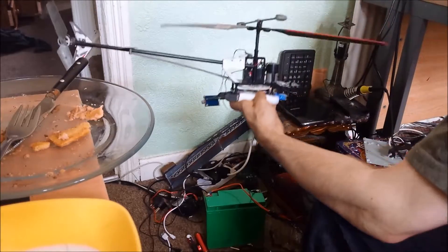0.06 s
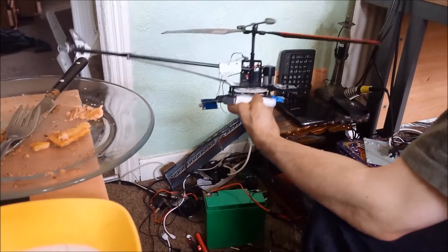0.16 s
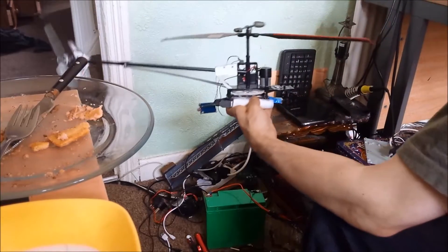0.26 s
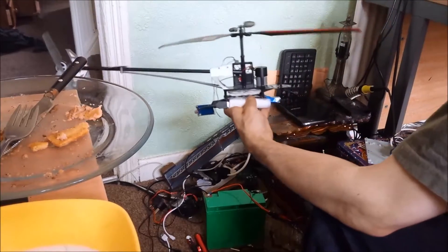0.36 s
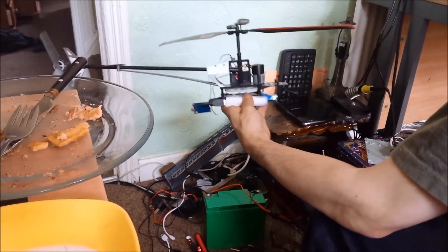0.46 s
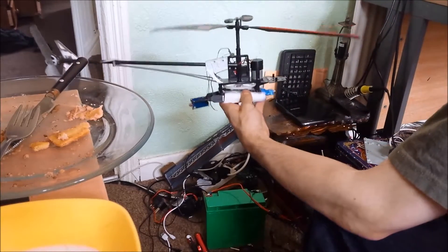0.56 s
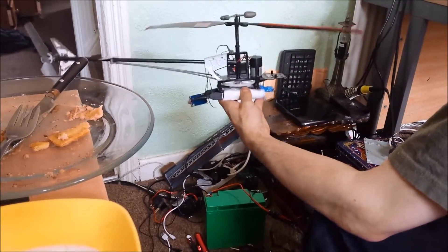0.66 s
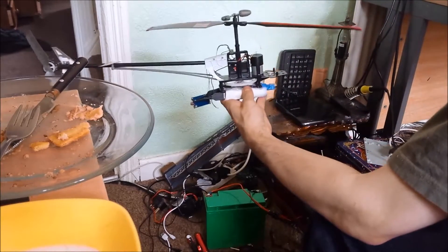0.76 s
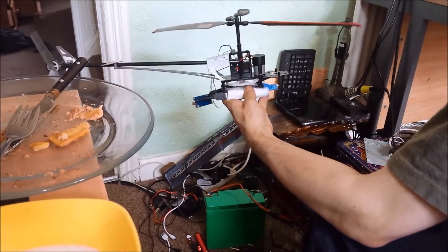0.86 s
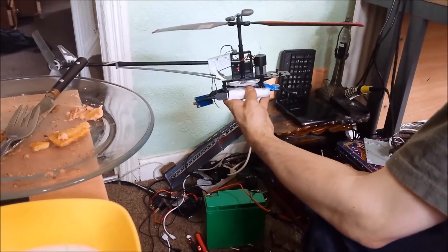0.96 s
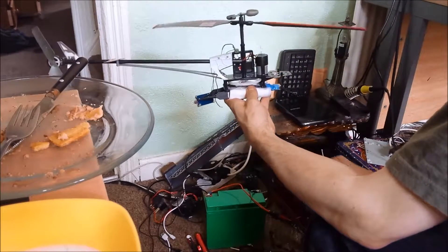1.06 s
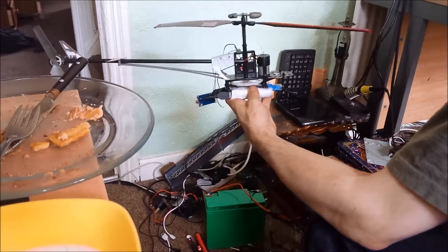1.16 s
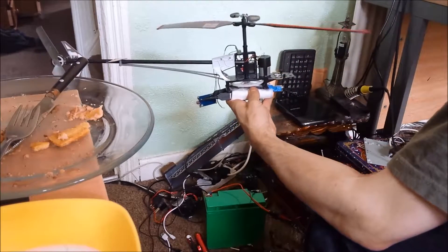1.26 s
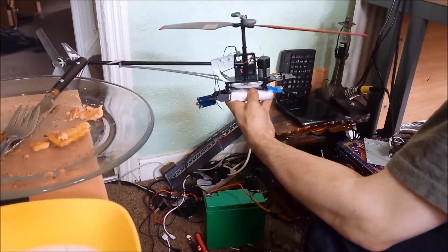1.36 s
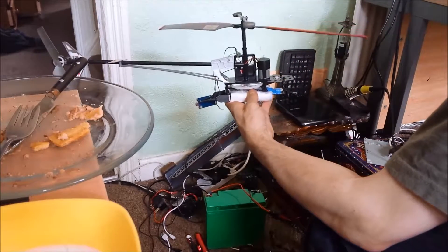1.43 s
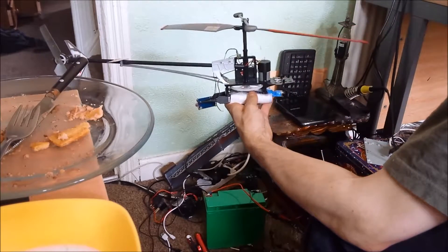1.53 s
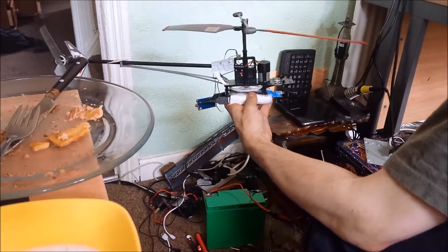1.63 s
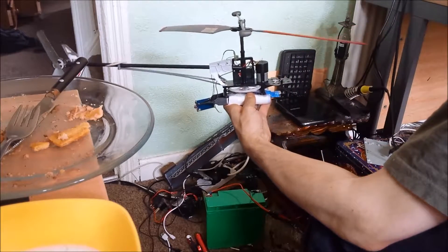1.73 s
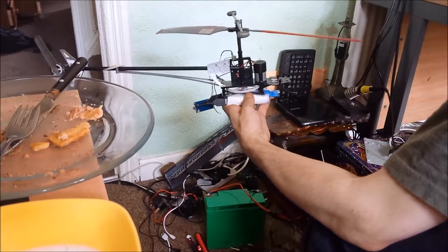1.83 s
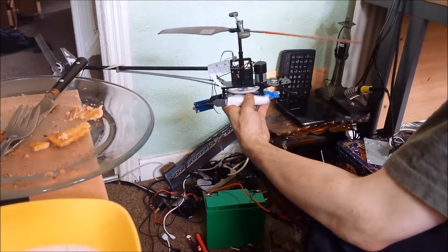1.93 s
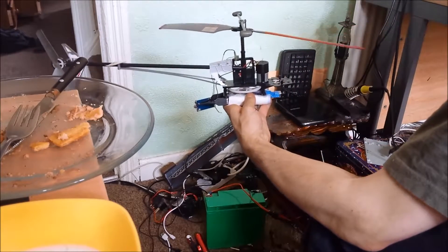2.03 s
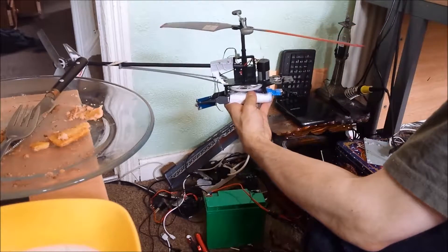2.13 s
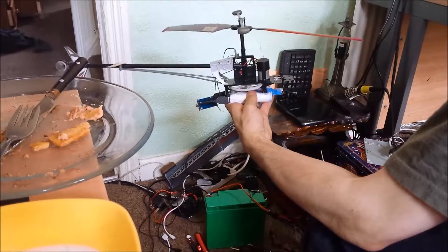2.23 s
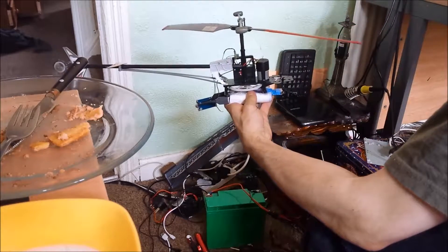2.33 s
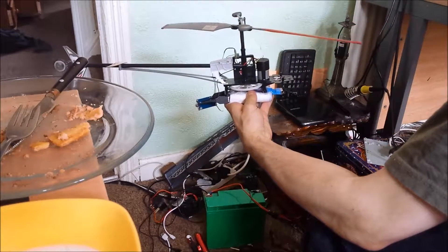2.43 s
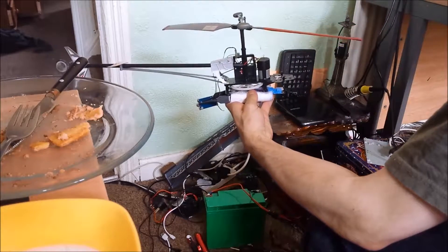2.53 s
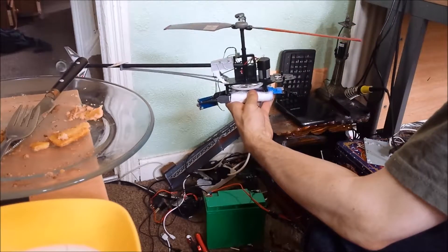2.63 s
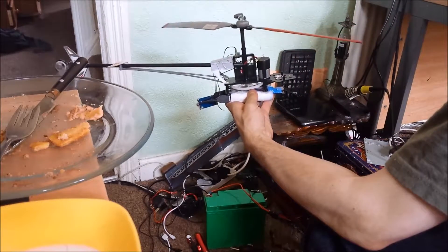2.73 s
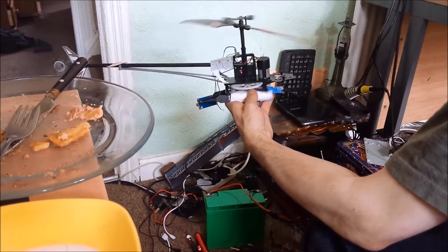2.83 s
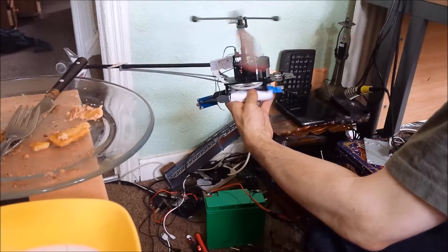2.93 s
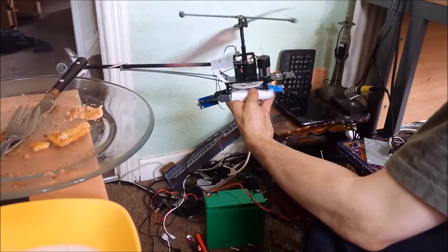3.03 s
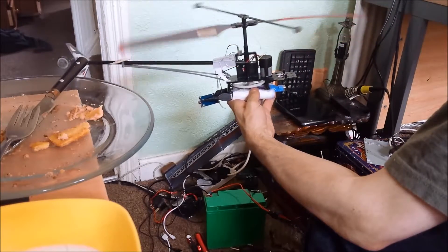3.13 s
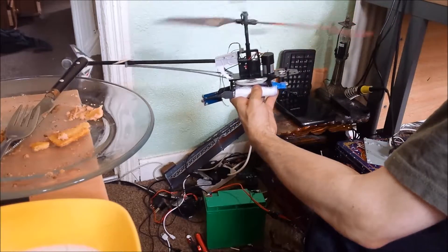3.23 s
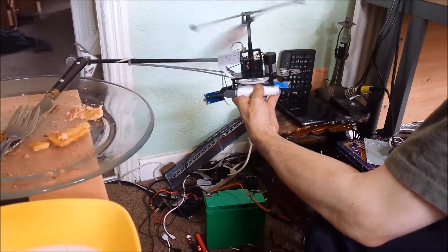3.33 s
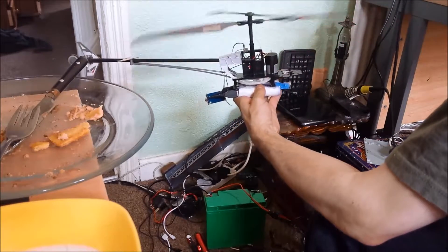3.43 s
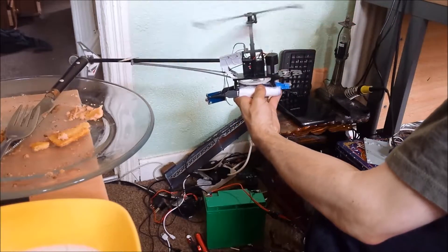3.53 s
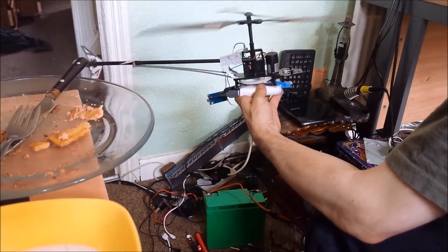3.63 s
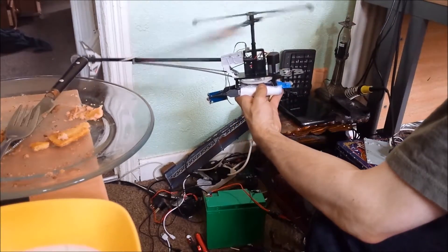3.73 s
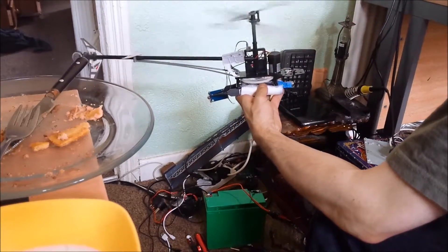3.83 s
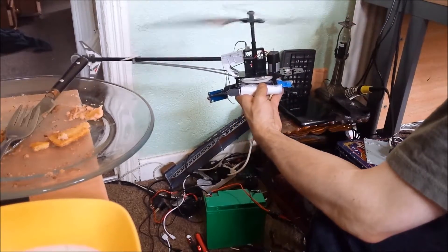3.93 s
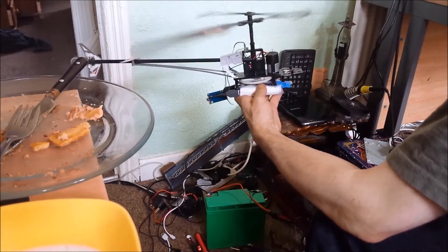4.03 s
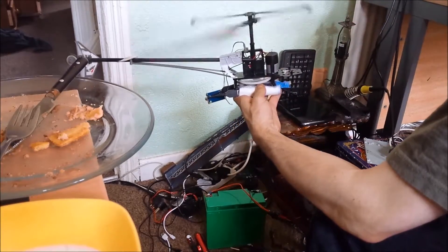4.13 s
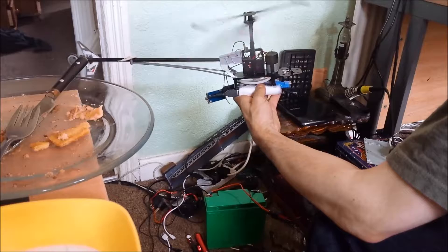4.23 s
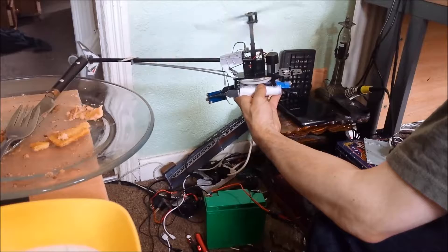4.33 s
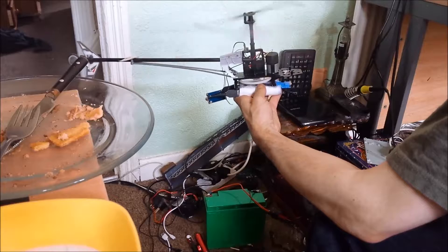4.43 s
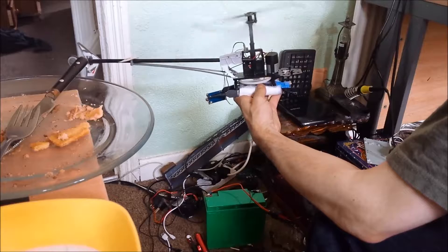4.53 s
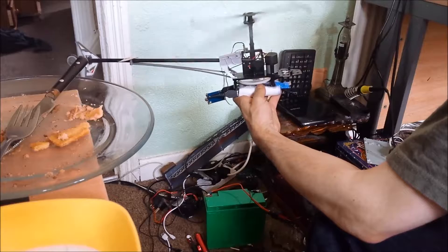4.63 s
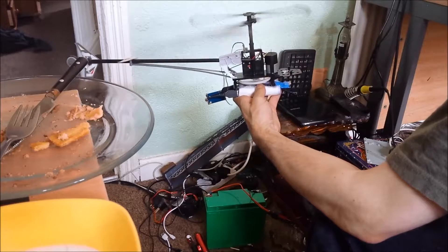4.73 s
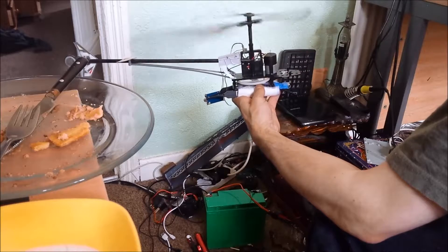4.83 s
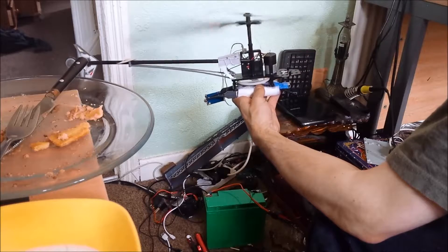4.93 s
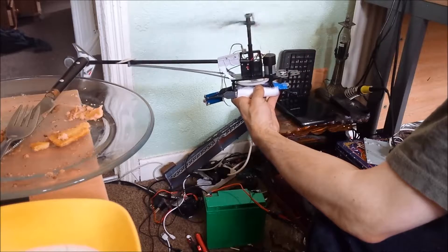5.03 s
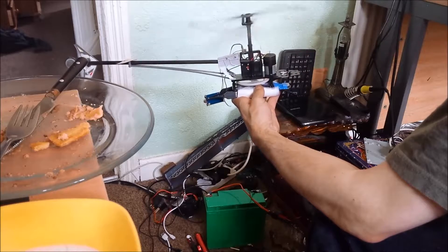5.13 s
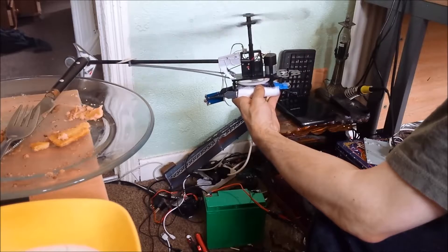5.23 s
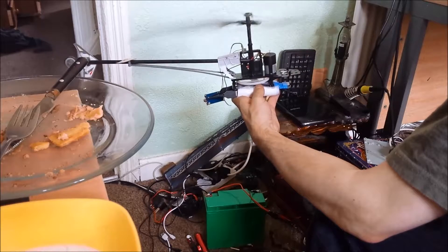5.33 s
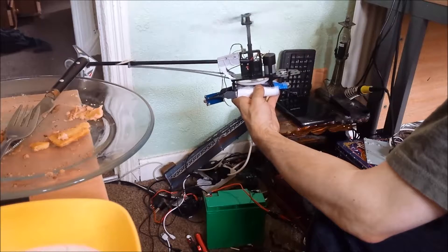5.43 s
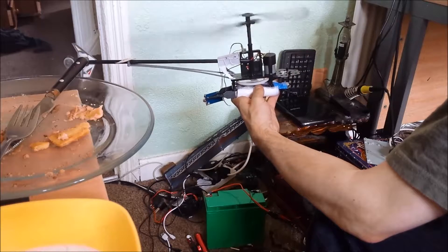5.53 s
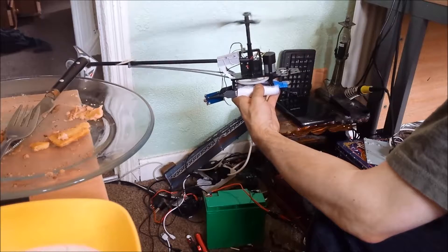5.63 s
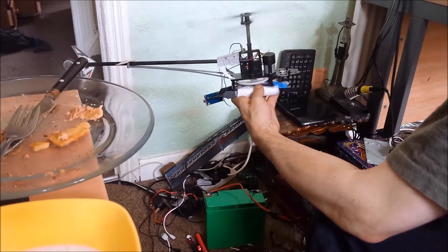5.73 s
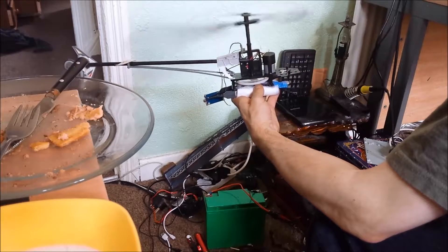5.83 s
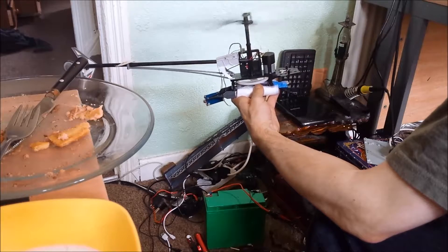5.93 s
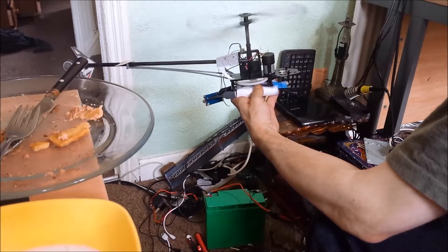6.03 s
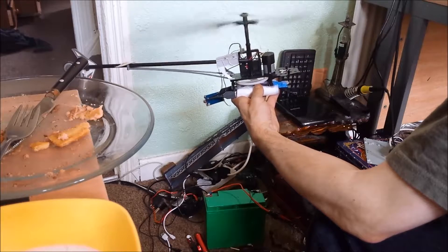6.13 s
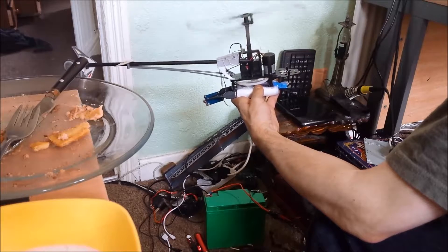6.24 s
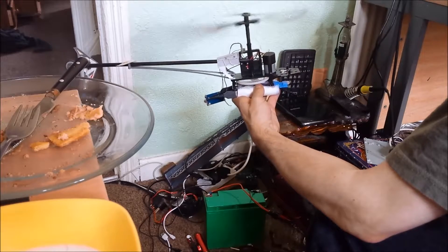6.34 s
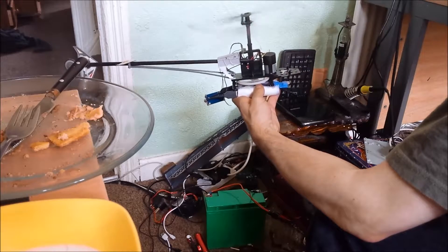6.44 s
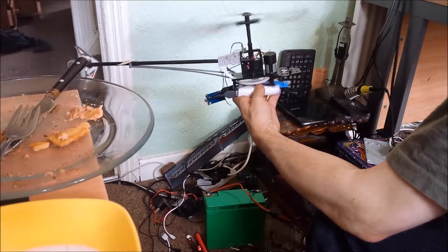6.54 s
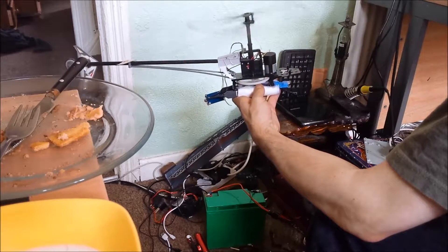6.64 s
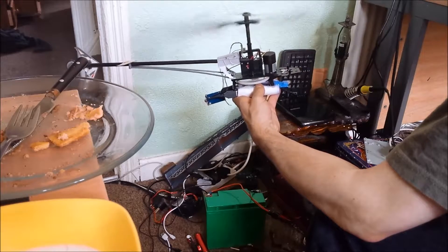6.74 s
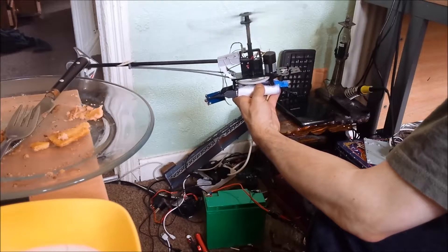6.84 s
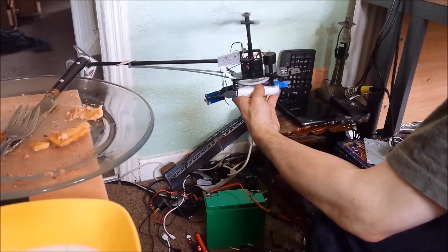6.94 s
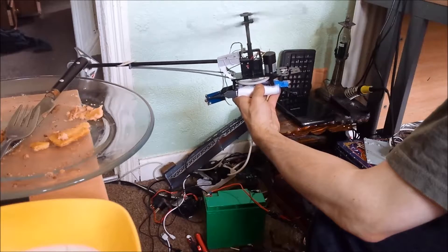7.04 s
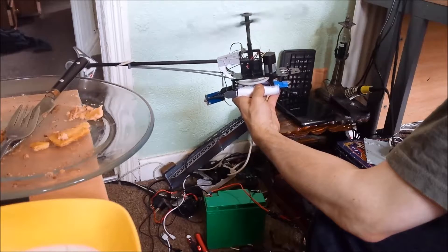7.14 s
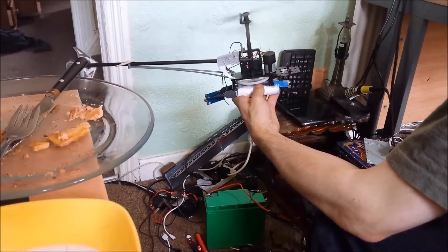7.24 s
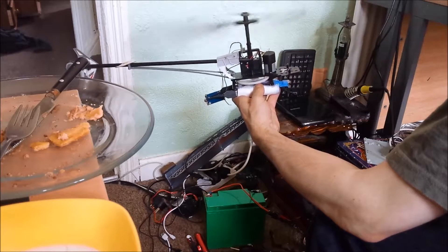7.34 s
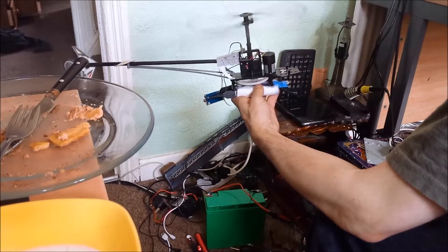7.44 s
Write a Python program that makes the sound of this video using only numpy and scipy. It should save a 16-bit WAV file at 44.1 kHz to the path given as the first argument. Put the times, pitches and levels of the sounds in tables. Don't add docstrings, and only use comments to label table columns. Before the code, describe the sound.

From 0 to 2.2 s the scene is quiet: low outside rumble and a soft room hiss, busiest at the start and sinking by 1.8 s. A thin, wavering, high squeak passes faintly at 0.3-0.45 s, and small dry finger ticks are scattered about, clearest near 1.2 and 1.7 s. At 2.27 s a small tail motor starts abruptly, buzzing grittily and rising until power cuts at 2.55 s, then runs down faintly. At 2.9 s the main motor turns with weak, stuttering false starts, then winds up from 3.4 s. Bright plastic gear rattle throbs faster and swells, with sharp loose knocks crowding 3.7-5 s. From 5 s it is a loud, dense, nearly steady whirring rattle over a low drone and airy rumble, knocks softer within it. It pushes faster after 6 s and again near 7.5 s, ending still running. Close stereo, short room echo.

```python
import sys
import numpy as np
from scipy import signal
from scipy.fft import rfft, irfft
from scipy.io import wavfile

SR = 44100
rng = np.random.default_rng(int(sys.argv[2]) if len(sys.argv) > 2 else 0)


def elevation(decibels):
    levels = np.asarray(decibels, float)
    return 10 ** (levels / 20)


def wav_record(signal):
    frames = np.transpose(np.atleast_2d(signal))
    bounded = np.clip(frames, -1, 1)
    quanta = np.round(bounded * 32767).astype(np.int16)
    wavfile.write(sys.argv[1], SR, quanta)


N = 329986
FULL_LOAD_DB = -26


def in_time(rows):
    seconds, *columns = np.transpose(rows)
    return [np.interp(np.arange(N) / SR, seconds, column) for column in columns]


def at_hz(points, hz):
    points = np.array(points)
    return np.interp(np.log(hz + 1), np.log(points[:, 0] + 1), points[:, 1])


def rms_one(x):
    return x / np.sqrt(np.mean(x ** 2) + 1e-20)


def drift(rate_hz):
    r = np.exp(-2 * np.pi * rate_hz / SR)
    noise = rng.standard_normal(N + SR)
    return rms_one(signal.lfilter([1], [1, -2 * r, r * r], noise)[SR:])


def split(x, hz):
    filters = [signal.butter(2, hz, kind, fs=SR, output="sos") for kind in ("low", "high")]
    return [signal.sosfilt(np.tile(sos, (2, 1)), x) for sos in filters]


def running(start_s, stop_s=np.inf):
    t = np.arange(N) / SR
    return (t > start_s) & (t < stop_s)


def teeth(per_s, uneven_db):
    own_share = 0.72
    uneven = np.minimum(rng.exponential(1, (3, N)), 5)
    sizes = elevation(uneven_db * uneven) * rng.choice([-1, 1], (3, N))
    both, *own = sizes * (rng.random((3, N)) < per_s / SR)
    return rms_one(np.sqrt(1 - own_share) * both + np.sqrt(own_share) * np.array(own))


def burst(s, db, hz, t60, ring, top_hz, hold_s=0.):
    out, start, t = np.zeros(N), round(s * SR), np.arange(SR // 4) / SR
    band = signal.butter(2, [1300, top_hz], "band", fs=SR, output="sos")
    noise = signal.sosfilt(band, rng.standard_normal(len(t)))
    tone = rms_one(signal.lfilter(*signal.iirpeak(hz, 7.0, fs=SR), noise))
    blow = (noise + ring * tone) * elevation(-60 * np.maximum(t - hold_s, 0) / t60)
    blow = blow * elevation(db) / np.abs(blow).max()
    out[start:start + len(t)] = blow[:N - start]
    return out


# frequency in Hz, left minus right in dB.
EAR_BALANCE = [(60, 15.5), (99, 3), (160, 13.5), (270, -12.5), (450, 7.5), (740, -5.5), (1210, 2.5),
               (2000, 0), (3310, 0), (5460, 8), (9010, -7.5), (14900, -4.5)]


def coloured(x, spectrum, peaks=(), side=0):
    size = 8192
    hz = np.arange(size // 2 + 1) * SR / size
    db = at_hz(spectrum, hz) + side * at_hz(EAR_BALANCE, hz) / 2
    db = db + sum(top / (1 + (2 * (hz - f) / width) ** 2) for f, width, top in peaks)
    cepstrum = irfft(np.log(np.maximum(elevation(db), 1e-5)))
    cepstrum[1:size // 2] *= 2
    cepstrum[size // 2 + 1:] = 0
    return signal.fftconvolve(x, irfft(np.exp(rfft(cepstrum))))[:N]


def to_ears(pair, spectrum, peaks=()):
    room_t60_s, room_db, left_lag_s = 0.27, -8, 6.5e-5
    t, ears = np.arange(int(.4 * SR)) / SR, []
    for x, side in zip(pair, (1, -1)):
        echo = rng.standard_normal(len(t)) * elevation(-60 * t / room_t60_s) * (t > .003)
        echo = echo / np.linalg.norm(echo)
        heard = coloured(x, spectrum, peaks, side)
        late = np.interp(np.arange(N) - (side > 0) * left_lag_s * SR, np.arange(N), heard)
        ears.append(late + elevation(room_db) * signal.fftconvolve(heard, echo)[:N])
    return rms_one(np.array(ears)) * np.sqrt(np.mean(pair ** 2))


# time in seconds, rattle level in dB.
GEAR_LOAD = [(2.88, -41), (2.93, -37), (2.99, -33), (3.08, -44.5), (3.1, -32.5), (3.31, -37.5),
             (3.38, -34.5), (5.04, -25), (5.12, -26.5), (5.21, -25), (5.36, -26.5), (5.42, -23),
             (5.61, -24), (5.62, -23.5), (7.21, -23), (7.48, -24)]
# time in seconds, speed in turns per second.
MOTOR_SPEED = [
    (2.9, 16.1),
    (3.5, 37),
    (4.0, 56),
    (4.5, 71),
    (5.0, 82),
    (5.5, 88),
    (6.0, 89),
    (6.5, 103),
    (7.0, 101),
    (7.48, 121),
]
# frequency in Hz, level in dB per Hz.
GEAR_TONE = [(210, -56), (350, -25.5), (552, -15.5), (646, -16), (1120, -7), (1770, -10.5), (2830, -3),
             (3260, -5), (4690, -2.5), (5400, 0.5), (8120, -6), (13000, -20.5), (14300, -17.5),
             (15000, -55.5)]
# frequency in Hz, width in Hz, height in dB.
FRAME_RINGS = [(178.6, 12, 44), (1950, 26, 5), (2120, 14, 6), (2976, 200, 3.5), (2930, 31, -10),
               (4107, 53, 4.5), (4260, 90, 1), (5220, 48, -4.5), (5670, 60, 1.5), (6090, 81, 5.5),
               (6840, 63, 6.5), (7590, 70, 6)]


def main_drive():
    (load_db,), (turns,) = in_time(GEAR_LOAD), in_time(MOTOR_SPEED)
    short_db = load_db - FULL_LOAD_DB
    settled = turns / 52.5
    thin_db = -6.5 * np.maximum(1 - settled, 0)

    phase = 2 * np.pi * np.cumsum(turns * (1 + 0.0084 * drift(5.56))) / SR
    once_per_turn = np.cos(phase) + 0.17 * np.cos(2 * phase + 1.7)
    flutter_db = 0.77 * drift(29.0) + 1.0 * drift(57.0)
    throb_db = np.minimum(settled, 1) ** 2 * (2.1 * once_per_turn + flutter_db)

    loose = teeth(270, 3.3) * elevation(-13) * shaking()
    mesh = teeth(9000.0, 2.2) * elevation(throb_db) + loose
    low, rest = split(mesh * running(2.882), 950)
    drone, low = split(low, 260)
    middle, high = split(rest, 2350)
    high, air = split(high, 8000)
    rattle = high * elevation(load_db - 1.15)
    rattle = rattle + middle * elevation(-24.5 + 0.7 * short_db + thin_db)
    rattle = rattle + low * elevation(-23 + 0.42 * short_db + thin_db)
    rattle = rattle + air * elevation(-25 + 0.91 * short_db)
    rattle = rattle + drone * elevation(-19 + 0.83 * short_db)
    return to_ears(rattle + gear_knocks(), GEAR_TONE, FRAME_RINGS)


def shaking():
    turns, = in_time(MOTOR_SPEED)
    top_turns, half_width_turns = 66, 45
    return 1 / (1 + ((turns - top_turns) / half_width_turns) ** 2)


# time in seconds, peak in dB, pitch in Hz.
SLACK_KNOCKS = [(2.9287, -22, 5440), (3.0923, -21, 5180), (3.6895, -18, 6750), (3.7428, -20, 6190),
                (3.7922, -17, 5120), (3.8755, -15, 6760), (3.901, -16, 6220), (3.9449, -16, 6350),
                (4.0995, -10, 7340), (4.1559, -14, 7340), (4.2038, -17, 5480), (4.2612, -17, 5650),
                (4.3285, -10, 5310), (4.3449, -14, 5530), (4.5295, -14, 5470), (4.545, -12, 6220),
                (4.589, -11, 5080), (4.7371, -10, 6150), (4.8029, -10, 5570), (4.975, -11, 6670),
                (5.1432, -14, 5090), (5.2125, -8, 6080), (5.4006, -10, 6080), (5.5193, -10, 5570),
                (5.679, -10, 6670), (5.7448, -9, 6040), (5.8471, -10, 6150), (5.888, -10, 5120),
                (6.8183, -9, 5330), (6.8697, -10, 5110)]


def gear_knocks():
    late_s, late_db = 4.9, -4.5
    knocks = np.zeros(N)
    for s, db, hz in SLACK_KNOCKS:
        peak_db = db + 1.0 + (s > late_s) * late_db
        knocks += burst(s - .0005, peak_db, hz, t60=.022, ring=0.46, top_hz=16000, hold_s=.003)
    return .7 * knocks + .7 * split(knocks, 5000)[1] + .4 * split(knocks, 9000)[1]


# time in seconds, level in dB.
TAIL_BURST = [
    (2.272, -43),
    (2.3, -39),
    (2.33, -39),
    (2.41, -32.5),
    (2.536, -31),
    (2.552, -39.5),
    (2.612, -45.5),
    (2.75, -48),
    (2.9, -52.5),
]
# frequency in Hz, level in dB per Hz.
TAIL_TONE = [(210, -45), (350, -30), (384, -23.5), (509, -9), (866, -17), (1220, -11), (1980, -12.5),
             (2970, -3.5), (4390, -7), (5380, -1.5), (9730, -9), (14600, -23)]


def tail_motor():
    level_db, = in_time(TAIL_BURST)
    turning = running(TAIL_BURST[0][0], TAIL_BURST[-1][0])
    mesh = teeth(7000.0, 3.4) * elevation(level_db + 1.3 * drift(48.0))
    return to_ears(mesh * turning, TAIL_TONE)


# time in seconds, peak in dB, pitch in Hz, ring share, left minus right in dB.
FINGER_TICKS = [(0.164, -47, 6960, 0.53, -4), (0.2744, -50, 5930, .6, -0.5), (0.6389, -54, 2400, .6, -2),
                (0.734, -50, 7000, 1.5, -3), (1.029, -56, 6250, .4, -10), (1.215, -42.5, 7260, 0.85, -3),
                (1.212, -49, 3460, 3.5, 2), (1.36, -55, 4010, 3.0, -1), (1.503, -49, 6250, .6, -3),
                (1.6786, -41.5, 5750, 0.88, 1), (1.9425, -57, 5170, .6, -1.5),
                (2.0174, -56, 6570, .6, -1.0)]
# time in seconds, pitch in Hz, level in dB.
RUB_SQUEAK = [
    (0.27, 6200, -72),
    (0.31, 6150, -62),
    (0.37, 6020, -60),
    (0.40, 6280, -55),
    (0.45, 6150, -76),
]


def handling():
    ticks = np.zeros((2, N))
    for s, db, hz, ring, pan in FINGER_TICKS:
        for ear, side in enumerate((1, -1)):
            ticks[ear] += burst(s, db + 4.5 + side * pan / 2, hz, t60=0.21, ring=ring, top_hz=10800)
    hz, db = in_time(RUB_SQUEAK)
    t = np.arange(N) / SR
    fade = np.clip(np.minimum(t - RUB_SQUEAK[0][0], RUB_SQUEAK[-1][0] - t) / .015, 0, 1)
    wave = np.sqrt(2) * np.sin(2 * np.pi * np.cumsum(hz * (1 + .01 * drift(300.0))) / SR)
    return ticks + wave * elevation(db - 0.5 + 3.7 * drift(60.0)) * fade


# time in seconds, level in dB.
ROOM_BUSTLE = [
    (0, -1.5),
    (0.16, 0),
    (0.35, -0.2),
    (0.6, -4),
    (0.9, -5),
    (1.05, -5.5),
    (1.4, -5.5),
    (1.8, -9.5),
    (2.24, -9),
]
# frequency in Hz, level in dB per Hz.
ROOM_TONE = [(15, -34.5), (25, -3.5), (59, -1.5), (103, -7.5), (153, -2.5), (228, -5), (433, -4.5),
             (778, -3.5), (1260, -0.5), (1830, -10), (3370, -20), (4900, -19.5), (5740, -17.5), (7910, -19),
             (14600, -29.5)]
# frequency in Hz, width in Hz, height in dB.
ROOM_HUM = [(173.3, 11, 6), (240, 59, 7)]
# frequency in Hz, likeness from -1 to 1.
EAR_LIKENESS = [(60, 0.88), (130, 0.94), (290, 0.79), (640, 0.33), (1400, -0.13), (3080, 0.05),
                (6770, -0.03), (14900, -0.3)]


def surroundings():
    alike = np.clip(at_hz(EAR_LIKENESS, np.fft.rfftfreq(N, 1 / SR)), -1, 1)
    mid, side = (rfft(coloured(rng.standard_normal(N), ROOM_TONE, ROOM_HUM)) for _ in range(2))
    noise = irfft(np.sqrt(1 + alike) * mid + np.sqrt(1 - alike) * side * [[1], [-1]], N)
    rumble, rest = split(noise, 363)
    deep, boom = split(rumble, 84)
    murmur, hiss = split(rest, 2100)

    (bustle_db,), (load_db,), (tail_db,) = in_time(ROOM_BUSTLE), in_time(GEAR_LOAD), in_time(TAIL_BURST)
    stir_db = np.maximum(load_db, tail_db) - FULL_LOAD_DB
    wash = elevation(-46.5 + .4 * stir_db) * running(TAIL_BURST[0][0])
    shake = elevation(-55.5) * shaking()
    boom_level = np.hypot(elevation(-49 + 0.99 * bustle_db), wash) * elevation(1.2 * drift(4.4))
    deep_level = np.hypot(elevation(-67 + 0.98 * bustle_db), shake) * elevation(2.0 * drift(4.2))
    murmur_level = elevation(-53.5 + 0.94 * bustle_db)
    hiss_level = elevation(-55.5 + 0.91 * bustle_db)
    return (rms_one(boom) * boom_level + rms_one(deep) * deep_level
            + rms_one(murmur) * murmur_level + rms_one(hiss) * hiss_level)


def scene():
    return elevation(3.0) * main_drive() + elevation(5.0) * tail_motor() + handling() + surroundings()


def band_limit(x):
    return signal.sosfilt(signal.butter(12, 15470, fs=SR, output="sos"), x)


def record(dry):
    hiss = elevation(-70) * rms_one(split(rng.standard_normal(dry.shape), 9000)[1])
    return band_limit(dry + hiss)


dry = scene()
out = record(dry)
wav_record(out)
```